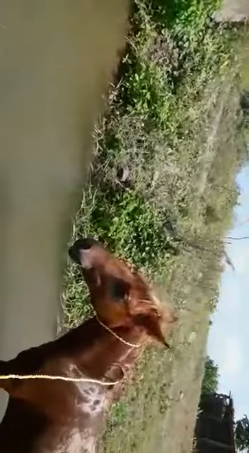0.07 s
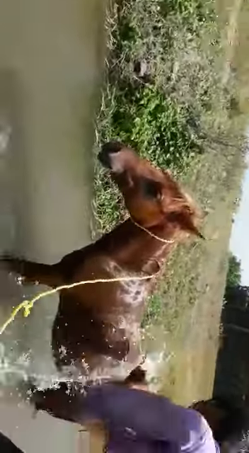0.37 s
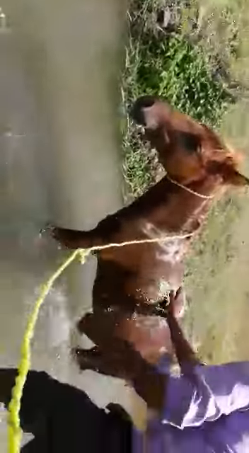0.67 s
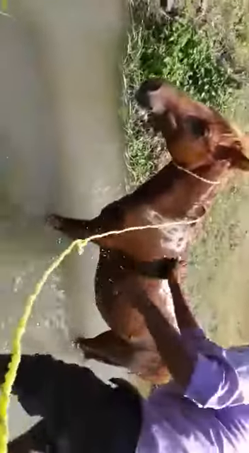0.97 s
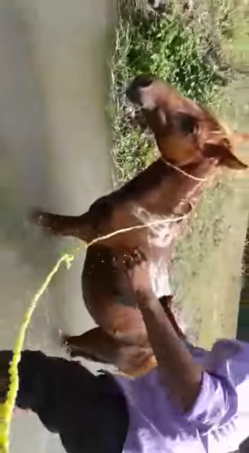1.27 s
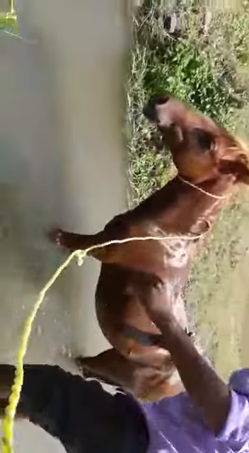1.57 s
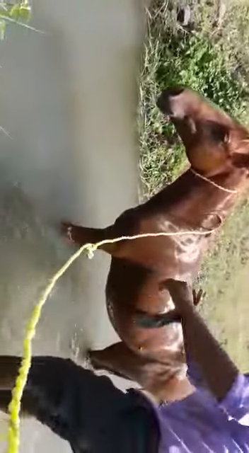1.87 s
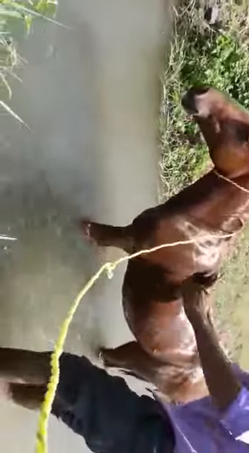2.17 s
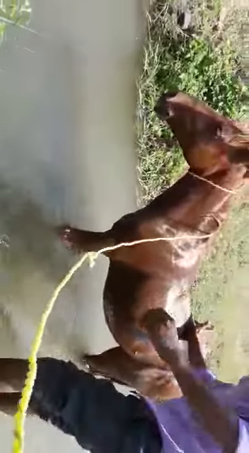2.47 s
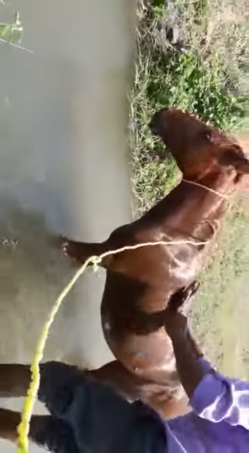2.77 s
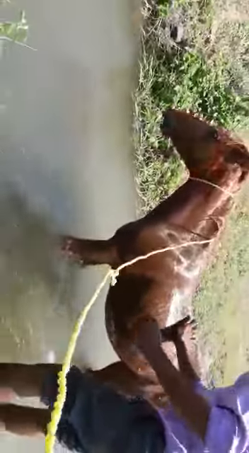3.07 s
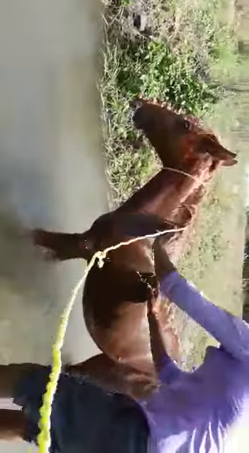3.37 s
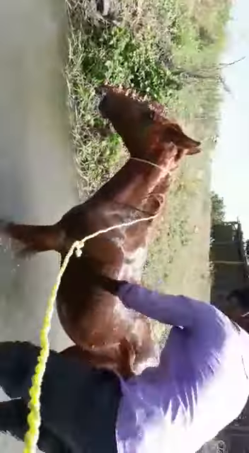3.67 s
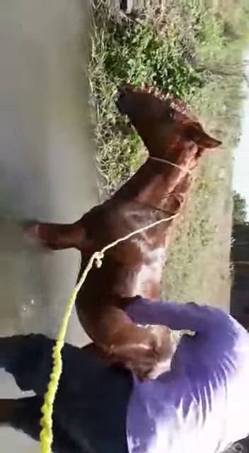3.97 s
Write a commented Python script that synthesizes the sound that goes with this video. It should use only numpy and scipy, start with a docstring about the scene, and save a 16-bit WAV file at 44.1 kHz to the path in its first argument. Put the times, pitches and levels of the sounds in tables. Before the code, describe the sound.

Water splashes close by, slapping and spraying over a horse in a pond, loudest during the first second. The run-off trickles and plops back, thinning to single drips by about 3 seconds. From 1.4 seconds, hands rub the wet coat in soft swishes, two or three a second, until near the end. A distant bird twitters faintly from about 2 to 3.4 seconds over a low outdoor rumble.

```python
"""A shallow pond outdoors, one microphone close to a horse standing in the water.
A person scoops water over its flank and rubs the wet coat by hand. The splashes slap and spray,
then the run-off trickles back, ringing as bubbles, and thins out into single plops and drips.
Far off a small bird twitters, over a faint outdoor rumble."""
import sys
import numpy as np
from scipy import signal
from scipy.fft import rfft, irfft
from scipy.io import wavfile

SR = 44100
rng = np.random.default_rng(int(sys.argv[2]) if len(sys.argv) > 2 else 0)


def generate_wav(sig):
    """Save sig (samples, or channels by samples) to the path in sys.argv[1] as 16-bit PCM at SR."""
    pcm = np.round(np.clip(np.atleast_2d(sig).T, -1, 1) * 32767).astype(np.int16)
    wavfile.write(sys.argv[1], SR, pcm)


N = 4 * SR


def amp(db):
    """Decibels to gain."""
    return 10 ** (np.asarray(db) / 20)


def unit(x):
    """Scales to rms 1."""
    return x / np.sqrt(np.mean(x ** 2) + 1e-20)


def add(mix, start_s, sound):
    """Mixes a sound in at a time."""
    part = mix[max(round(start_s * SR), 0):][:len(sound)]
    part += sound[:len(part)]


def band(x, lo_hz, hi_hz):
    """One broad resonance between two edges."""
    return signal.sosfilt(signal.butter(2, [lo_hz, hi_hz], "band", fs=SR, output="sos"), x)


def colour(x, spectrum):
    """Shapes a sound with a causal filter drawn through (Hz, dB) points; rms 1."""
    hz, db = np.transpose(spectrum)
    bin_hz = abs(np.fft.fftfreq(4096, 1 / SR)) + 1
    log_gain = np.interp(np.log(bin_hz), np.log(hz), db) * np.log(10) / 20
    minimum_phase = np.exp(np.conj(signal.hilbert(log_gain)))
    taps = np.fft.ifft(minimum_phase).real[:2048]
    return unit(signal.oaconvolve(x, taps)[:len(x)])


def wander(hz):
    """Random drift, mostly slower than hz; rms 1."""
    rolloff = np.exp(-(np.fft.rfftfreq(N, 1 / SR) / hz) ** 2)
    return unit(irfft(rfft(rng.standard_normal(N)) * rolloff, N))


def impacts(per_s, spread_db):
    """Random clicks of uneven size, with the same mean power at any rate."""
    chance = per_s / SR
    size = amp(spread_db * np.minimum(rng.exponential(1, N), 3.5))
    return size * rng.choice([-1, 1], N) * (rng.random(N) < chance) / np.sqrt(chance)


def air(level_db=-64):
    """The bed of the place: low outdoor rumble and quiet hiss."""
    # Each row: frequency in Hz, relative level in dB.
    spectrum = [(25, -18.5), (45, 0.5), (80, 6.5), (300, -13), (1500, -20), (5000, -12.5), (9000, -20)]
    return amp(level_db) * colour(rng.standard_normal(N), spectrum)


def bird(warble_depth=.011):
    """A distant bird repeats a thin warbling phrase of dips and upward sweeps, never quite alike."""
    # Each row: time of the phrase in seconds, level in dB.
    phrases = [(1.922, -45.5), (2.191, -43.5), (2.451, -46), (2.713, -45.5), (2.975, -46.5), (3.253, -45)]
    # Each row: offset and length in seconds, first and last pitch in Hz, level within the phrase in dB.
    notes = [(-.035, .032, 5600, 5250, -6), (-.003, .028, 4600, 5700, 0), (.028, .035, 6450, 6900, -12),
             (.11, .035, 4800, 6500, -15)]
    out = np.zeros(N)
    warble = 1 + warble_depth * wander(hz=393)
    for phrase_s, db in phrases:
        for offset, length, first_hz, last_hz, note_db in notes:
            start = phrase_s + offset
            progress = np.arange(0, 1, 1 / (length * SR))
            accent, bend = rng.uniform(-1.16, 1, 2)
            sweep_hz = first_hz + (last_hz - first_hz) * progress ** (2 + bend)
            hz = sweep_hz * warble[round(start * SR):][:len(progress)]
            envelope = amp(db + note_db + 2 * accent) * np.sin(np.pi * progress)
            add(out, start, envelope * np.sin(2 * np.pi * np.cumsum(hz) / SR))
    return out


def rubs(scrape_hz=2100, scrape_width=1.7, flutter_db=3, flank_db=-14):
    """The palm sweeps the wet hair: a crackling swish, a stick-slip scrape, a soft flank rumble."""
    # Each row: loudest moment and half length in seconds, swish level and scrape level in dB.
    strokes = [(1.426, .03, -44, -50.5), (1.812, 0.021, -45.5, -43), (2.237, 0.04, -50.5, -61),
               (2.427, 0.063, -55, -87), (2.696, 0.04, -51, -61), (2.935, 0.039, -56.5, -69),
               (3.227, 0.069, -51, -67), (3.628, 0.043, -50.5, -56.5)]
    # The coat's swish at the microphone. Each row: frequency in Hz, relative level in dB.
    spectrum = [(250, -23), (1200, -35), (2700, -9.5), (7300, -10), (8800, -18), (15000, -14)]
    t = np.arange(N) / SR
    power = np.zeros((2, N))
    for peak_s, half_s, swish_db, scrape_db in strokes:
        power += amp([[swish_db], [scrape_db]]) ** 2 * np.exp(-((t - peak_s) / half_s) ** 2)
    press, drag = np.sqrt(power)
    hairs = colour(impacts(per_s=1800, spread_db=2.5) + rng.standard_normal(N), spectrum)
    slips = impacts(per_s=400, spread_db=.5)
    scrape = unit(band(slips, scrape_hz / scrape_width, scrape_hz * scrape_width))
    flank = unit(band(rng.standard_normal(N), lo_hz=59, hi_hz=113))
    flutter = amp(flutter_db * wander(hz=136))
    return press * (hairs * flutter + amp(flank_db) * flank) + drag * scrape


def tick(decay_s=.0022):
    """The crisp burst of one drop breaking up."""
    # Each row: frequency in Hz, relative level in dB.
    spectrum = [(500, -12.5), (4000, 1), (9000, -7.5), (13000, -9)]
    t = np.arange(SR // 20) / SR
    return colour(rng.standard_normal(len(t)), spectrum) * np.exp(-t / decay_s)


def spatter():
    """Drops and wet fingers click without trapping a bubble."""
    # Each row: start in seconds, level in dB.
    clicks = [(0.109, -24), (.484, -28), (.712, -25), (1.861, -45), (2.675, -53), (2.774, -40.5),
              (2.794, -38.5), (3.208, -49)]
    out = np.zeros(N)
    for start, db in clicks:
        add(out, start, amp(db) * tick())
    return out


def bubble(hz, cycles, rise=.075):
    """A sine that dies by 1/e in the given cycles and rises as the bubble nears the surface."""
    age = np.arange(0, 2 * np.pi, hz / cycles / SR)  # in decay times
    phase = 2 * np.pi * cycles * (age + rise * age * (age / 2 - 1))
    return np.sin(phase) * np.exp(-age) * (1 - np.exp(-age * cycles))


def drips(tick_db=-14, main_db=-1.5, lesser_db=-6, scatter_s=.0061):
    """A drop ticks on the surface and rings a cluster of tiny bubbles."""
    # Each row: start in seconds, relative level in dB, pitch in Hz.
    drops = [(.344, -25.5, 2070), (.652, -16.5, 3440), (1.106, -28.5, 2130), (1.378, -20, 2370),
             (1.679, -34.5, 2040), (1.896, -31, 3750), (1.965, -36.5, 2000), (2.04, -30, 3240),
             (2.124, -32.5, 4750), (2.172, -27, 5030), (2.222, -26, 5340), (2.27, -31, 2460),
             (2.54, -37, 5950), (2.729, -35, 2240), (3.458, -32, 5230), (3.849, -38, 3680)]
    out = np.zeros(N)
    for start, db, hz in drops:
        add(out, start, amp(db + tick_db) * tick())
        add(out, start, amp(db + main_db) * bubble(hz, cycles=7.8))
        for late, pitch in rng.random((3, 2)):
            lesser = bubble(hz * 2 ** (pitch - .5), cycles=4.8)
            add(out, start + scatter_s * late, amp(db + lesser_db) * lesser)
    return out


def plops(main_db=1.5, lesser_db=-8.5, swell_s=.0045, gurgle_s=.04):
    """Run-off plunges into the pond: one big bubble swells and lesser ones gurgle on after it."""
    # Each row: start in seconds, relative level in dB, pitch in Hz.
    plunges = [(0.653, -23.5, 1114), (0.925, -32, 655), (1.02, -37, 632), (1.225, -34.5, 572),
               (1.276, -32, 700), (1.591, -32.5, 640), (1.759, -33.5, 795), (1.845, -47, 603.5),
               (1.897, -30, 1040), (2.0, -41.5, 699), (2.123, -44, 724), (2.504, -41.5, 678),
               (2.632, -41.5, 743), (2.701, -41.5, 1068), (3.104, -42, 772)]
    out = np.zeros(N)
    for start, db, hz in plunges:
        ring = bubble(hz, cycles=11.74, rise=.054 * rng.random())
        swell = np.minimum(np.arange(len(ring)) / SR / swell_s, 1)
        add(out, start, amp(db + main_db) * ring * swell)
        for late, pitch, glide in rng.random((4, 3)):
            lesser = bubble(hz * 2 ** (.5 * pitch - .15), cycles=5.5, rise=.057 * (glide - .5))
            add(out, start + gurgle_s * late, amp(db + lesser_db) * lesser)
    return out


def slaps(attack_s=.0025, cavity_width=1.35):
    """Each mass of water lands and opens a cavity that booms briefly."""
    # Each row: start in seconds, level in dB, cavity pitch in Hz, decay in seconds.
    landings = [(.066, -16, 1430, 0.0074), (.08, -31.5, 515, 0.058), (.208, -24.5, 545, 0.027),
                (.218, -29.5, 315, 0.02), (.474, -22, 710, 0.0057), (0.564, -23.5, 613, 0.0027),
                (0.879, -28.5, 1620, 0.0029), (1.58, -33.5, 1490, 0.0098)]
    out, t = np.zeros(N), np.arange(N) / SR
    for start, db, hz, decay_s in landings:
        boom = unit(band(rng.standard_normal(N), hz / cavity_width, hz * cavity_width))
        envelope = np.minimum(t / attack_s, 1) * np.exp(-np.maximum(t - attack_s, 0) / decay_s)
        add(out, start, amp(db) * boom * envelope)
    return out


def swarm(strength, lo_hz, hi_hz, per_s, cycles, spread_db, sizes=48, thinning=.55):
    """Many bubbles of mixed sizes, fewer as the flow's strength falls from 1; rms 1."""
    rate = per_s / sizes * strength ** thinning
    out = np.zeros(N)
    for k, (detune, sustain, glide) in enumerate(rng.random((sizes, 3))):
        hz = lo_hz * (hi_hz / lo_hz) ** ((k + detune) / sizes)
        ring = bubble(hz, cycles * (.5 + sustain), rise=.057 * (glide - .3))
        out += signal.oaconvolve(impacts(rate, spread_db), ring / np.linalg.norm(ring))[:N]
    return unit(out)


def falling_water(patter_db=2.5, fizz_db=-3.5, mist_fade=.33):
    """Spray patters on the pond in clumps, bursts into droplets and traps bubbles of all sizes."""
    # Each row: time in seconds, relative levels of the spray and of the gurgling in dB.
    flow = [(0, -43.5, -48.5), (.09, -40.5, -31.5), (0.36, -42.5, -36.5), (.53, -38, -39.5),
            (.68, -39.5, -38), (.81, -43.5, -47), (0.864, -52, -55), (0.883, -40, -72), (.97, -45, -45),
            (1.129, -50.5, -49.5), (1.44, -47.5, -40.5), (1.61, -50.5, -47.5), (1.72, -50.5, -50),
            (1.96, -54.5, -68.5), (2.25, -57, -54), (2.35, -63, -69), (2.58, -61.5, -74),
            (2.721, -54.5, -49.5), (2.85, -70, -65.5), (4, -70, -72)]
    # The fine spray as heard through the microphone, which dips near 9 kHz.
    # Each row: frequency in Hz, relative level in dB.
    spectrum = [(130, -9.5), (450, -2), (2500, 3), (7300, 1.5), (8800, -13), (11500, 0.5), (16000, -4)]
    times, spray_db, gurgle_db = np.transpose(flow)
    t = np.arange(N) / SR
    spray = amp(np.interp(t, times, spray_db))
    gurgle = amp(np.interp(t, times, gurgle_db))
    strength = spray / spray.max()
    patter = amp(patter_db) * colour(impacts(per_s=3500 * strength ** .5, spread_db=2.5), spectrum)
    fizz = amp(fizz_db) * colour(rng.standard_normal(N), spectrum)
    droplets = amp(-7) * swarm(strength, lo_hz=6730, hi_hz=15000, per_s=290, cycles=4.9, spread_db=.5)
    tiny = amp(-1.5) * swarm(strength, lo_hz=2260, hi_hz=7160, per_s=520, cycles=7.4, spread_db=2.5)
    small = amp(-2) * swarm(strength, lo_hz=1007, hi_hz=2744, per_s=830, cycles=7.6, spread_db=5)
    large = amp(-4) * swarm(strength, lo_hz=535, hi_hz=1247, per_s=600, cycles=10.5, spread_db=3.5)
    clumps = unit(amp(2 * wander(hz=110)))
    mist = (patter + fizz) * clumps * strength ** mist_fade  # dies away sooner than the single drops
    return (mist + droplets + tiny) * spray + small * np.sqrt(spray * gurgle) + large * gurgle


def echoes(x, wet_db, t60_s):
    """Adds weak scattered echoes from the water, the horse and the banks."""
    t = np.arange(SR // 2) / SR
    reflections = rng.standard_normal(len(t)) * (rng.random(len(t)) < .05)
    tail = reflections * amp(-60 * t / t60_s) * (t > .003)
    return x + amp(wet_db) * signal.oaconvolve(x, tail / np.linalg.norm(tail))[:N]


def scene():
    """Water and hand close to the microphone and nearly dry, the bird far off with more echo; mono."""
    splashing = falling_water() + slaps() + plops() + drips() + spatter()
    near = echoes(splashing + rubs(), wet_db=-12.5, t60_s=.066)
    far = echoes(bird(), wet_db=-7, t60_s=.25)
    return (near + far + air())[None]


def record(dry):
    """The recorder cuts the treble above 16 kHz."""
    lowpass = signal.firwin(511, 16000, window=("kaiser", 9), fs=SR)
    return signal.oaconvolve(dry, lowpass[None], "same")


dry = scene()
out = record(dry)
generate_wav(out)
```